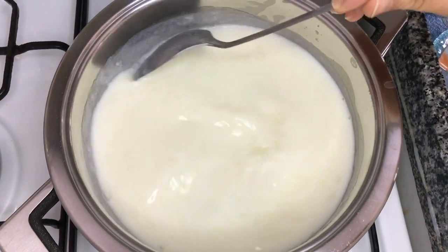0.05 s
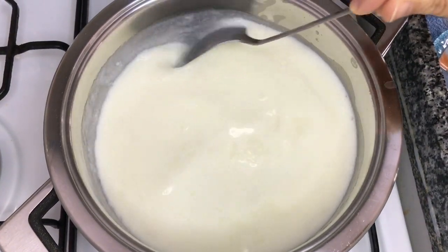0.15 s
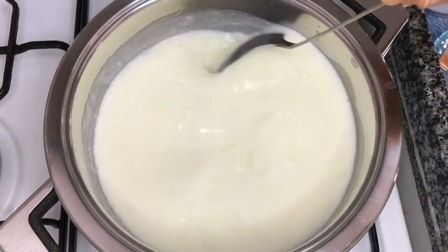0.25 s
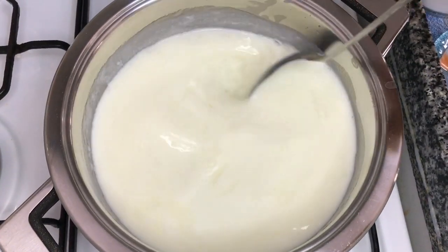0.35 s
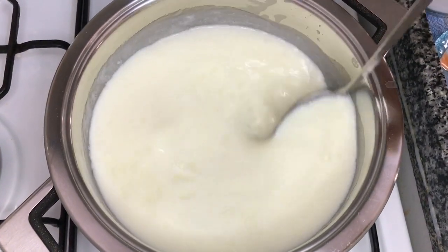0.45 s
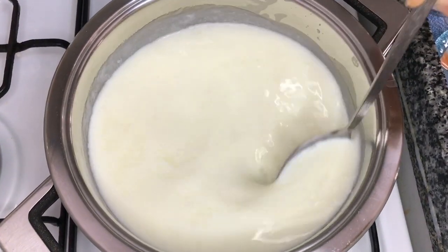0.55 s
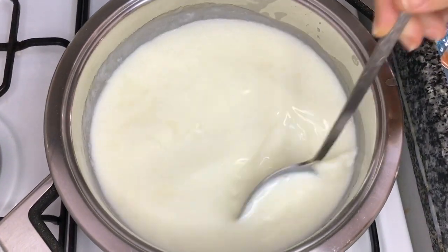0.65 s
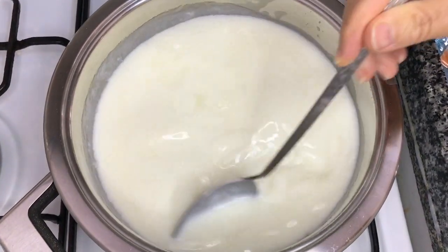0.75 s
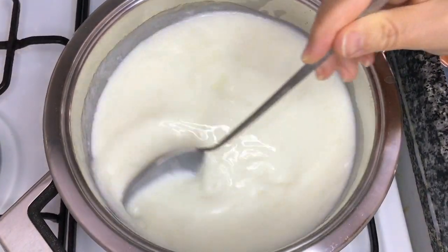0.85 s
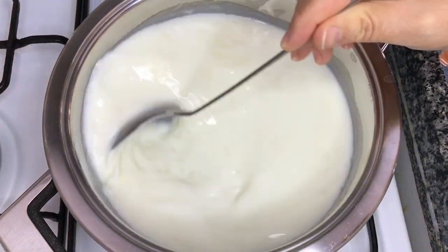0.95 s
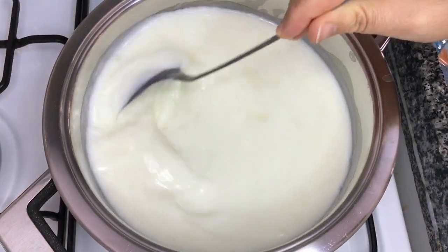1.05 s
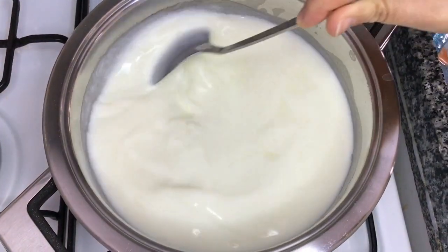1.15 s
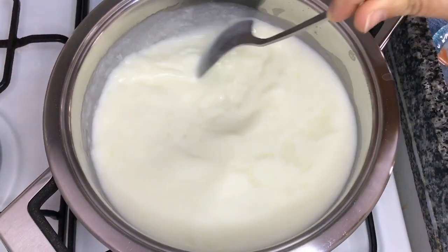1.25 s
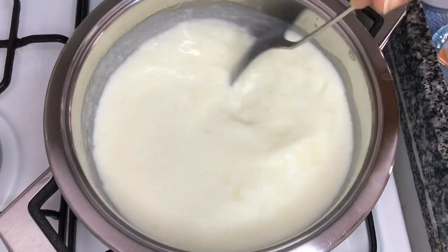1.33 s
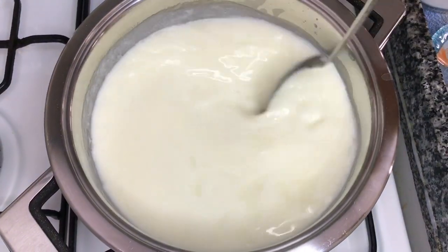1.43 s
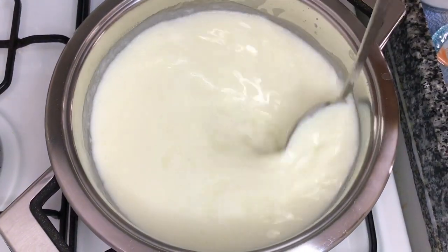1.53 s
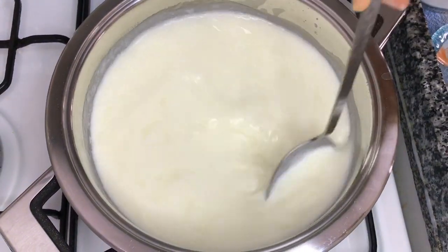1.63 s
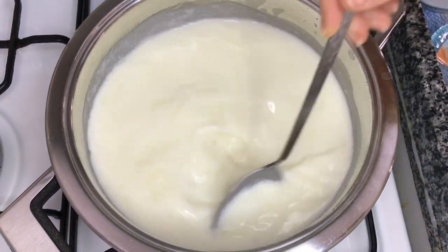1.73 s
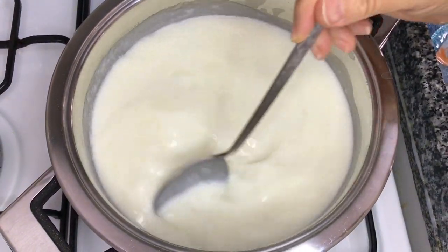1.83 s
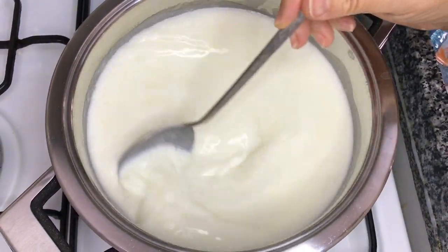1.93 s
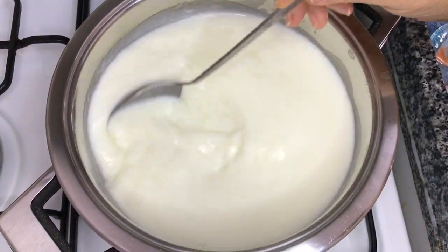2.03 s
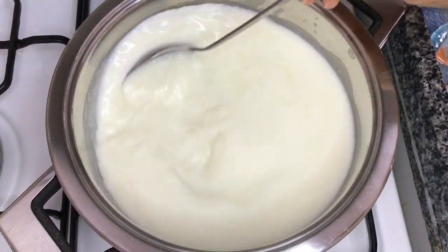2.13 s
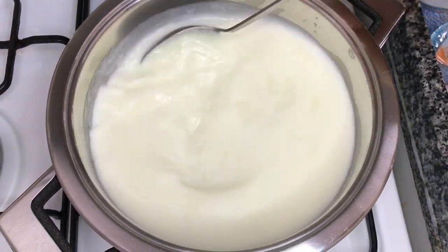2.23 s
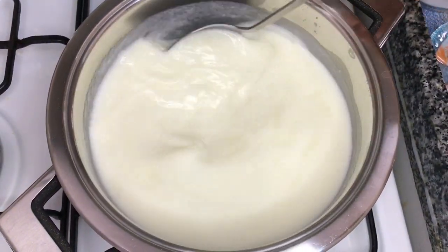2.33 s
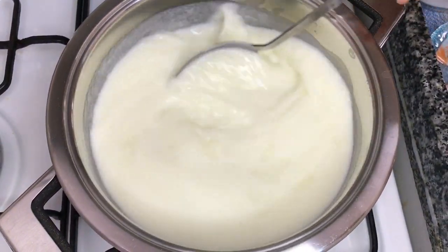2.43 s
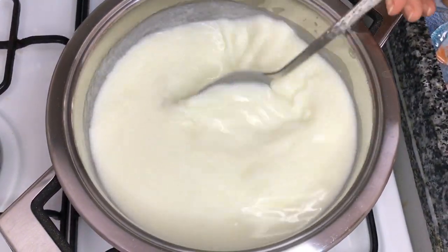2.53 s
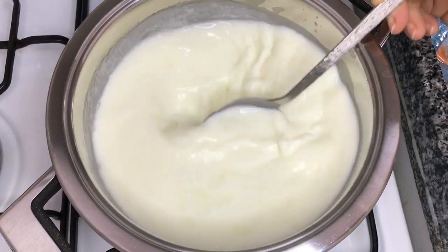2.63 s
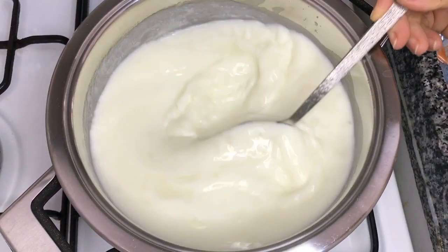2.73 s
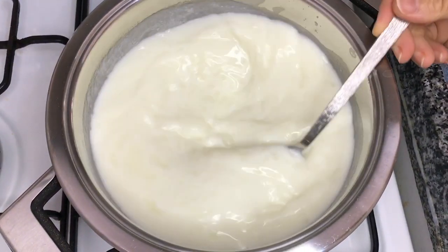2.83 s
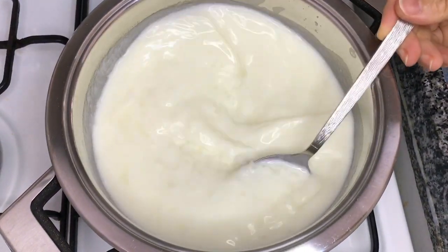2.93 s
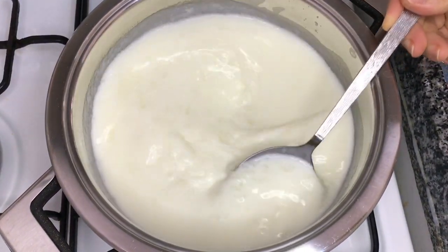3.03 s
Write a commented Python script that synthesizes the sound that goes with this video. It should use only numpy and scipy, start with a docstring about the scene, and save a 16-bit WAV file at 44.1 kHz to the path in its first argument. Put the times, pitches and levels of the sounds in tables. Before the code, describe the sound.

A steel spoon stirs thick milk and rice in a metal pot, heard close. A loud clink at 0.2 s starts a ringing, gritty scrape; clustered clinks follow near 0.8 and 1.23 s, and one at 1.8 s, each with scraping, faint squeaks and low pot wobble. Wet swishes and plops come around 1.0-1.2 s. After 2.3 s a softer scrape fades, with a gulp and plops at 2.6-2.8 s. Faint room noise and low hum continue.

```python
"""In a kitchen, a steel spoon circles through rice and milk in a steel pot, heard close up.
Random slips ring gliding spoon resonances and pot modes as a scrape; clinks are dense clacks plus pot modes.
Squeaks, a gulp and plops are short tones; swishes and slosh are filtered noise; rice ticks are decaying noise.
The pot rocks as an unsteady low tone, over a low hum and steady room noise, with a short echo on the pot."""
import sys
import numpy as np
from scipy import signal
from scipy.fft import rfft, irfft
from scipy.io import wavfile
from scipy.ndimage import uniform_filter1d

SR = 44100
rng = np.random.default_rng(int(sys.argv[2]) if len(sys.argv) > 2 else 0)


def materialize(psi):
    """Save the field psi as 16-bit PCM at rate SR to the path in sys.argv[1].

    A 1-D psi becomes a single channel; in a 2-D psi each row is a channel.
    """
    bounded = np.clip(np.atleast_2d(psi).T, -1, 1)
    quanta = np.round(bounded * 32767).astype(np.int16)
    wavfile.write(sys.argv[1], SR, quanta)


N = 136710
T = np.arange(N) / SR
HZ = np.fft.rfftfreq(N, 1 / SR)

# pot modes: mode_hz, struck_db, scraped_db, t60_s
POT_MODES = [(725.4, -5.5, 19.5, 0.15), (1275, -10.5, -8, 0.045), (1567, -3, 15, 0.1),
             (1730, -17, 10.5, 0.09), (2042, -10, -5, 0.21), (2335, -11.5, 10, 0.055),
             (2786, -10.5, 11, 0.12), (3540, -28, 6, 0.047), (3798, -17, 10, 0.047), (4286, -12, 6, 0.03),
             (4522, -16, 9.5, 0.019), (5820, -10, -34, 0.022)]
# spectrum of the dense, quickly damped ring of spoon and wall: freq_hz, level_db
CLACK_SPECTRUM = [(100, -25), (380, -16), (800, -16), (1500, -5.5), (3000, 2.5), (4300, 4), (5600, -2.5),
                  (7500, -13.5), (11000, -28.5), (16000, -46)]
CLACK_T60_S = 0.034
TONE_FLUTTER_DB, TONE_WANDER_HZ = 2.5, 67  # squeaks and gulp


def amp(db):
    """Decibels to gain."""
    return 10 ** (np.asarray(db) / 20)


def unit(x):
    """Scales to an rms of one."""
    return x / np.sqrt(np.mean(x ** 2) + 1e-20)


def add(mix, start_s, sound):
    """Mixes a sound in at a time, cut at the end of the mix."""
    part = mix[max(round(start_s * SR), 0):][:len(sound)]
    part += sound[:len(part)]


def colour(x, points, tilt_db=0):
    """Filters by a spectrum, with a tilt per octave above 1024 Hz."""
    octave = np.log2(np.fft.rfftfreq(len(x), 1 / SR) + 1)
    hz, db = np.transpose(points)
    # the tilt is flat below octave 10
    gain_db = np.interp(octave, np.log2(hz), db) + tilt_db * np.maximum(octave, 10)
    return irfft(rfft(x) * amp(gain_db), len(x))


def wander(rate_hz):
    """Slow random signal of rms one, low-passed near a rate."""
    return unit(irfft(rfft(rng.standard_normal(N)) / (1 + (HZ / rate_hz) ** 4), N))


def resonate(x, hz, width_hz):
    """A resonance of gain one that can glide: shift to 0 Hz, one-pole low-pass, shift back."""
    turn = np.exp(2j * np.pi * np.cumsum(hz * np.ones(len(x))) / SR)
    r = np.exp(-np.pi * width_hz / SR)
    return 2 * (turn * signal.lfilter([1 - r], [1, -r], x / turn + 1e-18)).real


def pressure():
    """Middle, treble and deep-ring gains of the strokes: each swells, fades slowly and lifts off."""
    # spoon drags over the steel or just grazes it: start_s, rise_s, lift_off_s, release_s (to -20 dB),
    # middle_db, treble_db, fade_db_per_s, deep_re_middle_db
    strokes = [(0.214, .16, 0.57, 0.1, -34, -38.5, -26, 3), (0.739, .05, 0.82, .02, -40.5, -44, 1.5, 5),
               (.79, 0.063, 1.045, 0.018, -39.5, -38.5, -18, 7.5),
               (1.09, 0.17, 1.174, 0.1, -38, -44.5, 0, 5),
               (1.222, 0.01, 1.484, 0.24, -30, -34.5, -29.5, -10),
               (1.522, 0.003, 1.512, 0.042, -34.5, -31.5, 0, -12),
               (1.56, 0.04, 1.644, 0.24, -44, -45.5, -12, 9),
               (1.796, 0.0068, 1.878, 0.24, -42.5, -41, -4, 9),
               (1.96, 0.0022, 1.966, 0.059, -45, -34, 0, -8),
               (1.98, 0.075, 2.14, 0.18, -39.5, -40, -20, -13),
               (2.296, 0.15, 3.2, 0.14, -33.5, -34, -44, 1.5),
               (2.76, 0.034, 2.915, 0.1, -47.5, -38.5, -25, -2.5),
               (2.989, 0.11, 3.05, 0.068, -41.5, -38, -60, 9.5)]
    power = np.zeros((3, N))
    for start, rise, end, release, middle_db, treble_db, fade_db, deep_db in strokes:
        held_s = np.clip(T - start - rise, 0, max(end - start - rise, 0))
        swell = np.sin(np.pi / 2 * np.clip((T - start) / rise, 0, 1))
        fall_db = fade_db * held_s - 20 * np.maximum(T - end, 0) / release
        level_db = [[middle_db], [treble_db], [middle_db + deep_db]]
        power += amp(level_db) ** 2 * swell ** 2 * amp(fall_db) ** 2
    return np.sqrt(power)


def patchy(x, depth_db):
    """Lets narrow bands swell and sink at random as the contact shifts."""
    z = signal.stft(x, nperseg=512, noverlap=384)[2]
    field = rng.standard_normal(z.shape)
    for _ in range(2):
        field = uniform_filter1d(uniform_filter1d(field, size=3, axis=0), size=9, axis=1)
    return signal.istft(z * amp(depth_db * unit(field)), nperseg=512, noverlap=384)[1][:N]


def scrape(middle, treble, deep):
    """Tiny slips of steel over steel and rice ring the spoon and the pot."""
    # gliding spoon resonances: time_s, low_hz, high_hz
    spoon_glide = [(.25, 1206, 2300), (.38, 1347, 2870), (.53, 1547, 3020), (.75, 1330, 2600),
                   (.97, 1274, 2700), (1.19, 1310, 2690), (1.291, 1274, 2520), (1.52, 1530, 3020),
                   (1.76, 1329, 2720), (2.108, 1216, 2775), (2.4, 1225, 2430), (2.8, 1150, 2290)]
    # the same two resonances: width_hz, gain_db
    spoon_peaks = [(60, 18), (130, 12.5)]
    # colour of the scrape: freq_hz, level_db
    scrape_spectrum = [(150, -13), (350, -75), (550, -10), (900, -6), (1250, -4.5), (2000, -1), (4800, 0.5),
                       (6200, -3), (8000, -14.5), (10000, -20), (12500, -32), (16000, -61)]
    slips_per_s, slip_spread_db, judder_db, judder_hz = 4000, 2.5, 1.5, 70
    body_share, patch_db = 0.44, 3
    rub_db, rub_rise_s = -59, 1
    grit_db, grit_follow = -59.5, 0.59

    slips = (rng.random(N) < slips_per_s / SR) * rng.choice([-1, 1], N)
    slips = slips * amp(slip_spread_db * np.minimum(rng.exponential(1, N), 4))
    slips = unit(slips * amp(judder_db * wander(judder_hz)))

    # dense ring in the wall
    t = T[:2048]
    wall = rng.standard_normal(len(t)) * amp(-60 * t / CLACK_T60_S)
    body = signal.fftconvolve(slips, wall)[:N]

    times, *tracks = np.transpose(spoon_glide)
    rings = []
    for track, (width_hz, db) in zip(tracks, spoon_peaks):
        rings.append((np.interp(T, times, track), width_hz, db))
    for hz, _, db, t60 in POT_MODES:
        rings.append((hz, np.log(1000) / np.pi / t60, db))
    # random signs keep the modes independent
    rung = [amp(db) * resonate(slips * rng.choice([-1, 1], N), hz, width_hz)
            for hz, width_hz, db in rings]
    sound = unit(slips + body_share * unit(body)) + sum(rung)

    # the spoon keeps singing softly between the strokes
    rub = unit(colour(sum(rung[:2]), scrape_spectrum)) * amp(rub_db) * np.clip(T / rub_rise_s, 0, 1)
    # fine bright grit that comes up when the spoon presses hard
    grit_band = (HZ / 7000) ** 6 / (1 + (HZ / 7000) ** 8)
    grit = unit(irfft(rfft(slips) * grit_band, N))
    grit = grit * amp(grit_db) * (treble / treble.max()) ** grit_follow

    spectrum = rfft(patchy(colour(sound, scrape_spectrum), patch_db))
    under_middle = 1 / (1 + (HZ / 880) ** 16)
    under_treble = 1 / (1 + (HZ / 3200) ** 12)
    low = irfft(spectrum * under_middle, N)
    mid = irfft(spectrum * (under_treble - under_middle), N)
    high = irfft(spectrum * (1 - under_treble), N)
    # band of the deepest pot mode, 620 to 880 Hz
    deepest = irfft(spectrum * under_middle / (1 + (620 / (HZ + 1)) ** 16), N)
    lower = (deep * deepest + middle * (low - deepest + mid)) / mid.std()
    return lower + treble * unit(high) + rub + grit


def squeak(start_s, length_s, first_hz, last_hz, db):
    """A short, thin tone that wavers and flutters."""
    count = int(length_s * SR)
    pitch_wander = 0.0072  # rms share of the pitch
    hz = np.linspace(first_hz, last_hz, count)
    hz = hz * (1 + pitch_wander * wander(TONE_WANDER_HZ)[:count])
    flutter = amp(TONE_FLUTTER_DB * wander(TONE_WANDER_HZ)[:count])
    tone = np.sin(2 * np.pi * np.cumsum(hz) / SR) * flutter
    return start_s, amp(db) * unit(tone) * np.sin(np.pi * T[:count] / length_s)


def clink(clack_db, ring_db, bright_db):
    """A short dense clack and the damped modes of the pot."""
    late_db, late_t60_s, onset_s = -48, 0.047, 0.00023
    t = T[:16384]
    fade = amp(-60 * t / CLACK_T60_S) + amp(late_db - 60 * t / late_t60_s)
    clack = unit(colour(rng.standard_normal(len(t)), CLACK_SPECTRUM, bright_db)) * fade
    ring = np.zeros(len(t))
    for hz, db, _, t60 in POT_MODES:
        level_db = db + bright_db * np.log2(hz / 2000) - 60 * t / t60
        detuned_hz = hz * (1 + 0.0042 * rng.standard_normal())
        ring += rng.choice([-1, 1]) * amp(level_db) * np.sin(2 * np.pi * detuned_hz * t)
    return (amp(clack_db) * clack + amp(ring_db) * ring) * np.minimum(t / onset_s, 1)


def swish(start_s, length_s, first_hz, last_hz, width_hz, db):
    """A short noise burst through two equal gliding resonances."""
    u = np.linspace(0, 1, int(length_s * SR))
    hz = first_hz * (last_hz / first_hz) ** u
    hiss = resonate(resonate(rng.standard_normal(len(u)), hz, width_hz), hz, width_hz)
    return start_s, amp(db) * unit(hiss) * np.sin(np.pi * u)


def ticks(effort):
    """Soft grains of rice pop under the spoon: sparse wet ticks, as strong as the stroke."""
    ticks_per_s, tick_re_stroke_db, spread_db, t60_s = 70, -11, 4, 0.016
    pops = (rng.random(N) < ticks_per_s / SR) * amp(spread_db * rng.standard_normal(N))
    tick = colour(rng.standard_normal(N), CLACK_SPECTRUM) * amp(-60 * T / t60_s)
    return amp(tick_re_stroke_db) * effort * unit(signal.fftconvolve(pops, tick)[:N])


def gulp():
    """An air pocket opens slowly, then all at once: a fluttering tone that dips, then shoots up."""
    # time_s, pitch_hz, level_db (before flutter)
    gulp_track = [(2.629, 730, -49.5), (2.666, 699.5, -40), (2.688, 953, -39.5), (2.698, 1237, -24),
                  (2.701, 1870, -32.5), (2.711, 2260, -42), (2.718, 2400, -60)]
    times, hz, db = np.transpose(gulp_track)
    level = amp(np.interp(T, times, db) + TONE_FLUTTER_DB * wander(TONE_WANDER_HZ))
    level = level * (T > times.min()) * (T < times.max())
    return level * np.sin(2 * np.pi * np.cumsum(np.interp(T, times, hz)) / SR)


def plop(peak_s, db, hz, glide_oct_per_s, swell_s, decay_s):
    """An air pocket in the milk rings, its pitch gliding, with exponential swell and decay."""
    lead_s = .04
    t = T[:4096] - lead_s
    pitch_hz = hz * 2 ** (glide_oct_per_s * np.clip(t, -lead_s / 2, lead_s / 2))
    level = amp(db) * np.exp(-np.maximum(-t / swell_s, t / decay_s))
    return peak_s - lead_s, level * np.sin(2 * np.pi * np.cumsum(pitch_hz) / SR)


def slosh(effort):
    """Thick milk folds over ahead of the spoon, loosely following the stroke."""
    # freq_hz, level_db
    slosh_spectrum = [(100, -56), (190, -2), (300, 6), (380, 2), (900, -19)]
    slosh_db, follow = -57.5, 0.9
    # sloshes less once the spoon only skims the milk
    skim_s, skim_drop_db = 2.22, 5.5
    drop_db = skim_drop_db * (1 + np.tanh((T - skim_s) / 0.067)) / 2
    swell = (effort + amp(-16)) ** follow * amp(3.0 * wander(6.7) - drop_db)
    return amp(slosh_db) * unit(colour(rng.standard_normal(N), slosh_spectrum) * swell)


def room(x):
    """A faint, short kitchen echo: decaying noise after a 6 ms gap."""
    echo_db, t60_s = -9.5, 0.17
    t = T[:SR // 2]
    tail = rng.standard_normal(len(t)) * amp(-60 * t / t60_s) * (t > .006)
    return amp(echo_db) * signal.fftconvolve(x, tail / np.linalg.norm(tail))[:N]


def low_tone(hz, share, rate_hz):
    """A low vibration of unsteady pitch, rms one."""
    return unit(np.sin(2 * np.pi * np.cumsum(hz * (1 + share * wander(rate_hz))) / SR))


def rocking():
    """The pot wobbles briefly on the grate around four of the knocks: an unsteady low tone."""
    # start_s, peak_db (before wander), length_s
    rocks = [(0.208, -48, 0.21), (0.77, -47.5, 0.24), (1.252, -43.5, 0.17), (1.796, -42.5, 0.21)]
    level = np.zeros(N)
    for start, db, length in rocks:
        arch = np.sin(np.pi * np.clip((T - start) / length, 0, 1))
        level += amp(db) * np.sqrt(np.maximum(arch, 0))
    return level * low_tone(hz=78.7, share=0.073, rate_hz=51) * amp(2 * wander(57))


def kitchen():
    """Steady room noise and a wavering low hum."""
    # hum: time_s, level_db (before wander and a 1 dB trim)
    hum_track = [(0, -46.5), (.95, -45.5), (1.05, -38), (1.4, -40), (2.3, -47), (3.1, -43)]
    # room noise: freq_hz, relative_db_per_hz
    floor_spectrum = [(20, 7), (45, -1), (100, 4), (170, -18), (330, -14), (520, -21.5), (2300, -10.5),
                      (5000, -11.5), (8000, -30.5), (10000, -16), (13000, -55), (16000, -68)]
    floor_db = -49
    hum = amp(np.interp(T, *np.transpose(hum_track))) * low_tone(hz=27.6, share=0.0847, rate_hz=11.0)
    hum = hum * amp(2 * wander(10) - 1)
    return hum + amp(floor_db) * unit(colour(rng.standard_normal(N), floor_spectrum))


def scene():
    """The stirred pot in its kitchen."""
    # spoon hits the pot: start_s, clack_db, ring_db, bright_db_per_octave
    clinks = [(.2148, -11.5, -20.5, -1.5), (.7845, -22, -32.5, 14), (.7875, -18, -22, -0.5),
              (1.2245, -24, -34, 9), (1.227, -15, -26, -3), (1.2312, -22, -23.5, -2.5),
              (1.2493, -24.5, -43, -6), (1.7922, -21, -21.5, 0)]
    # wet swishes, but a faint bright hiss before the first scrape and a soft graze at 1.063 s:
    # start_s, length_s, first_hz, last_hz, width_hz, level_db
    noise_bursts = [(.14, 0.078, 5300, 4900, 3000, -46.5), (0.959, 0.14, 3800, 3500, 400, -35.5),
                    (0.977, 0.15, 2560, 2080, 500, -37), (1.063, .024, 1770, 2170, 1410, -27),
                    (1.268, 0.2, 2180, 1750, 380, -39.5), (1.421, 0.13, 1500, 1780, 167, -41),
                    (2.068, 0.088, 1157, 1120, 324, -36), (2.452, 0.14, 7200, 13400, 4500, -51),
                    (2.767, 0.13, 4536, 5300, 1830, -43)]
    # thin wavering tones: the spoon's edge sings; the last, low one is the pot ringing:
    # start_s, length_s, first_hz, last_hz, level_db
    thin_tones = [(.302, 0.038, 1580, 1570, -36.5), (.335, 0.11, 1280, 1369, -41),
                  (.492, .105, 1605, 1551, -37.5), (1.028, 0.058, 1906, 1847, -35),
                  (1.11, 0.088, 1357, 1458, -40), (1.435, 0.057, 1467, 1437, -36.5),
                  (1.516, 0.031, 2945, 2930, -32.5), (1.52, 0.057, 1633, 1614, -36.5),
                  (2.955, 0.059, 729, 725, -42.5)]
    # air pockets: peak_s, level_db, pitch_hz at the peak, glide_oct_per_s, swell_s, decay_s
    plops = [(.972, -27.5, 1240, -5, .002, 0.014), (1.2038, -24, 1440, -2, 0.00042, 0.006),
             (2.6156, -23.5, 1550, 5, 0.00098, .005), (2.741, -33.5, 1245, 44.5, .004, .004),
             (2.762, -24.5, 2346, 0.5, 0.0021, 0.0061)]
    middle, treble, deep = pressure()
    pot = scrape(middle, treble, deep) + slosh(middle) + ticks(treble) + gulp()
    bubbles = np.zeros(N)
    for start_s, *blow in clinks:
        add(pot, start_s, clink(*blow))
    for row in noise_bursts:
        add(pot, *swish(*row))
    for row in thin_tones:
        add(pot, *squeak(*row))
    for row in plops:
        add(bubbles, *plop(*row))
    return (pot + room(pot) + bubbles + rocking() + kitchen())[None]


def record(dry):
    """Band limit: a steep linear-phase low-pass."""
    edge_hz = 16200
    low_pass = signal.firwin(511, edge_hz, window=("kaiser", 9), fs=SR)
    return signal.oaconvolve(dry, low_pass[None], "same")


dry = scene()
out = record(dry)
materialize(out)
```